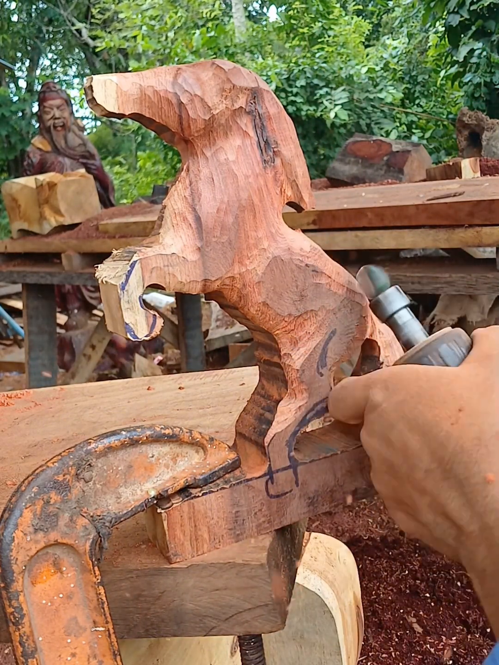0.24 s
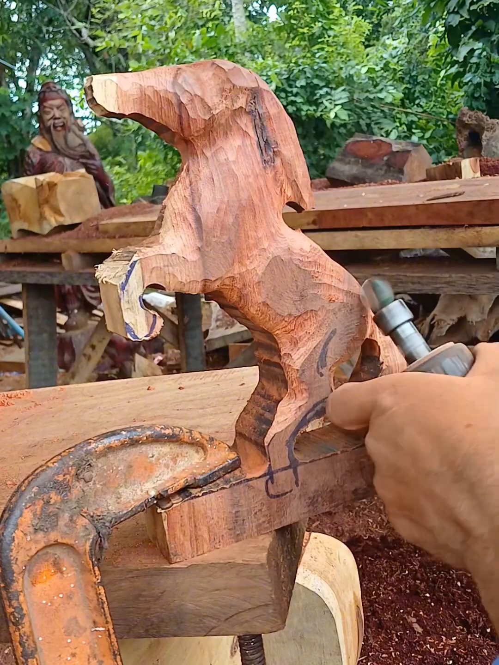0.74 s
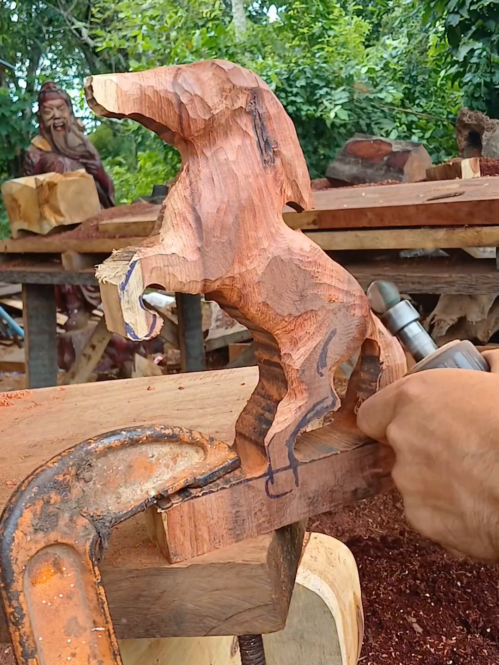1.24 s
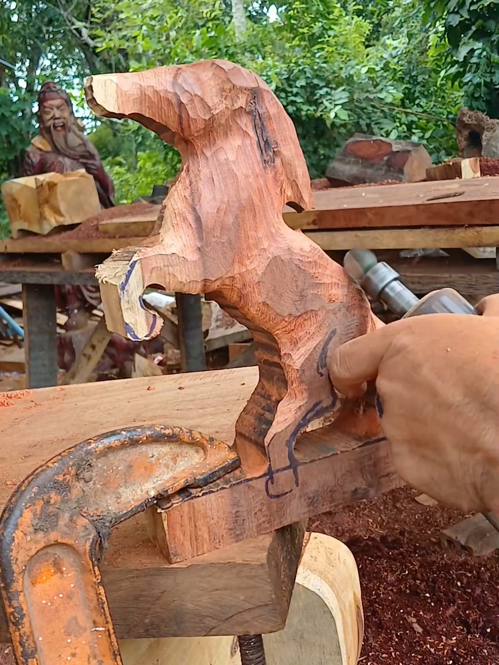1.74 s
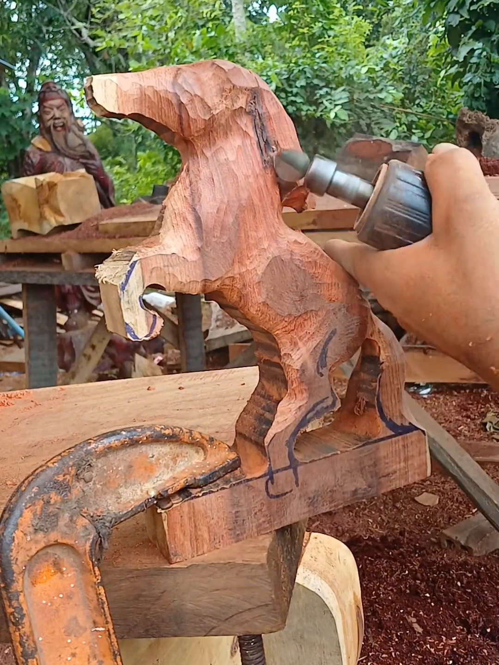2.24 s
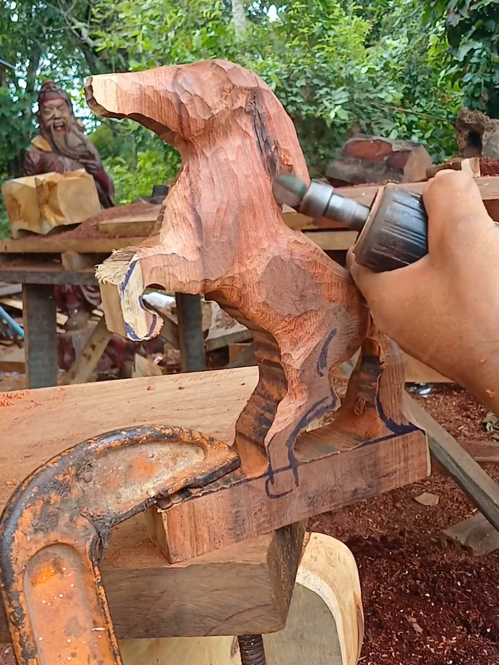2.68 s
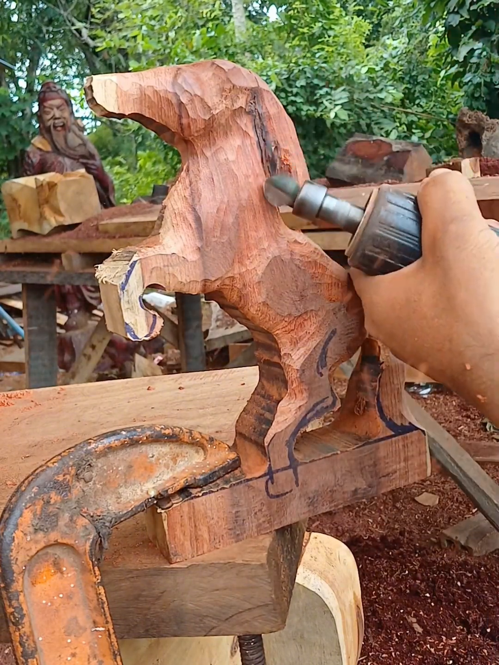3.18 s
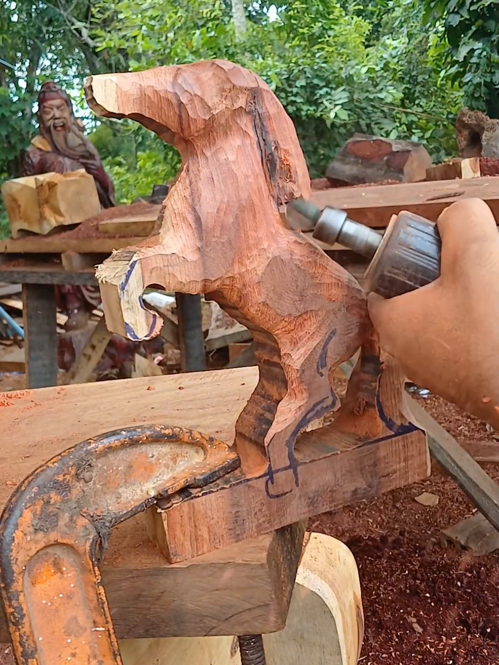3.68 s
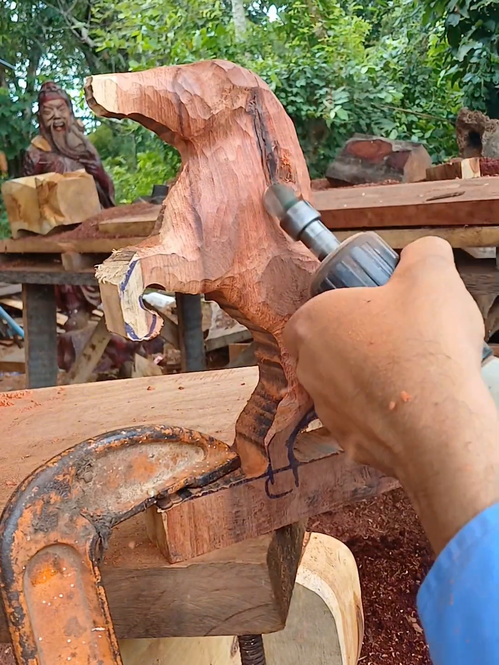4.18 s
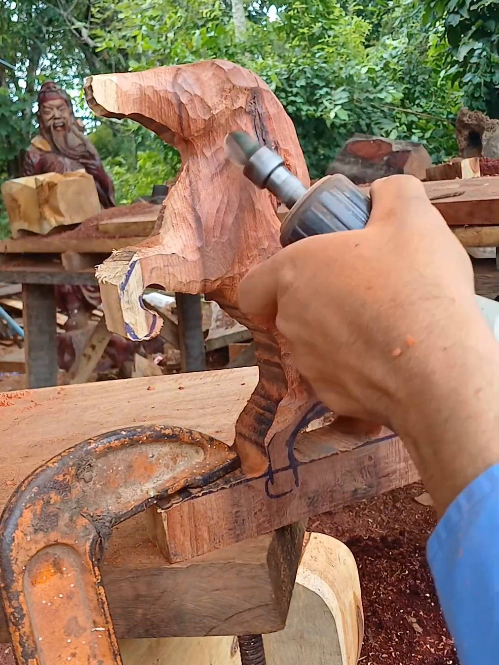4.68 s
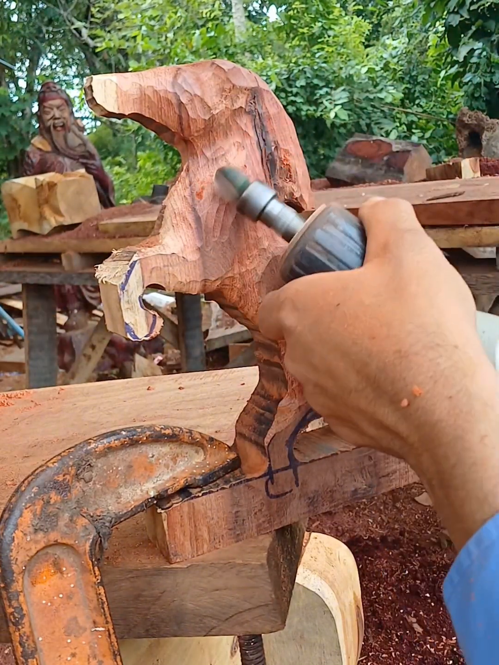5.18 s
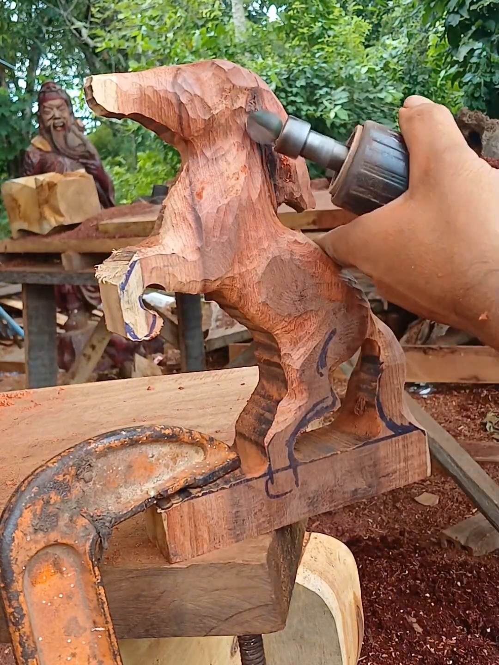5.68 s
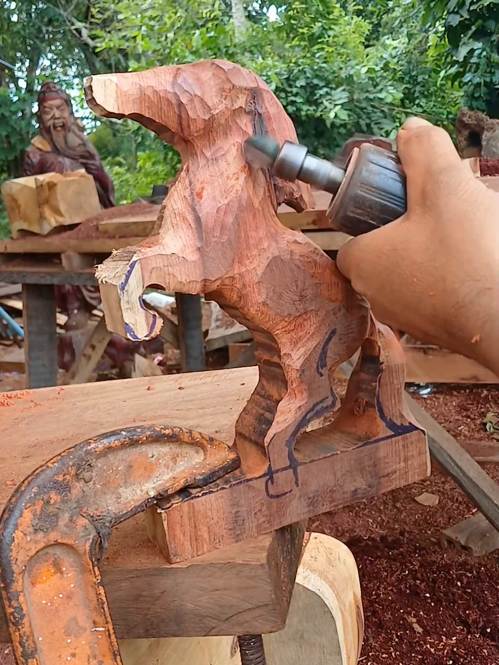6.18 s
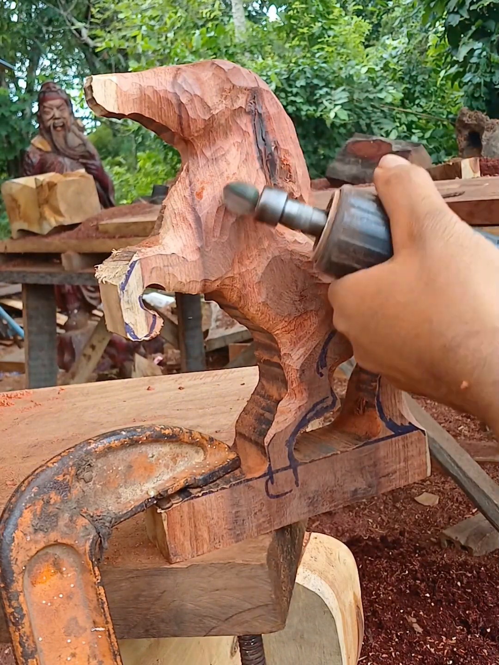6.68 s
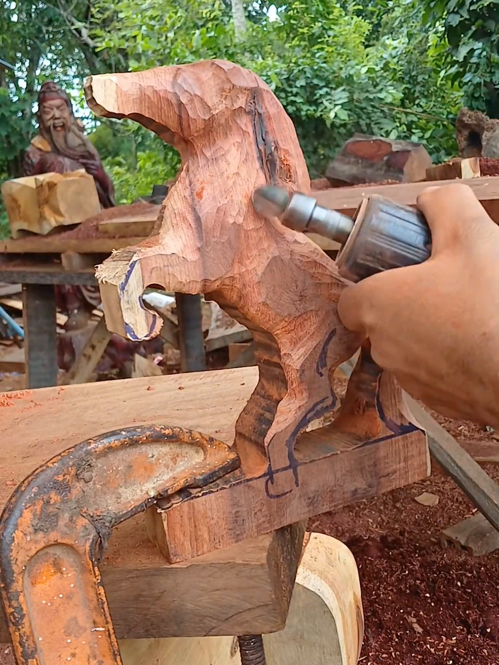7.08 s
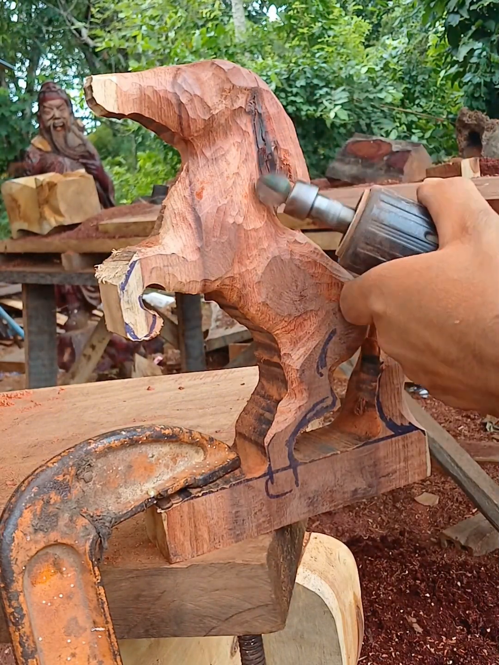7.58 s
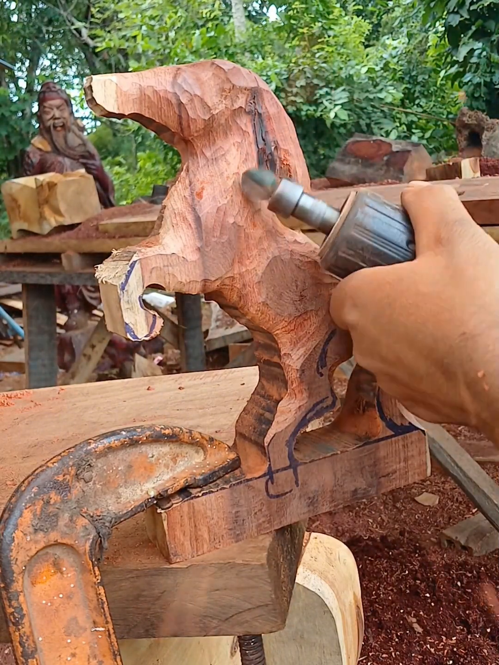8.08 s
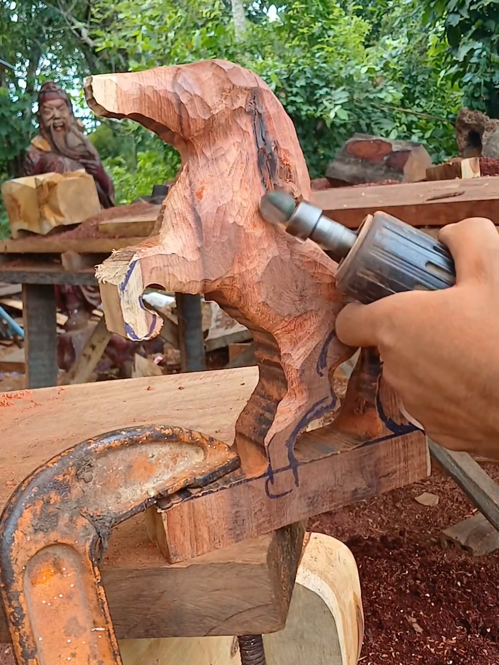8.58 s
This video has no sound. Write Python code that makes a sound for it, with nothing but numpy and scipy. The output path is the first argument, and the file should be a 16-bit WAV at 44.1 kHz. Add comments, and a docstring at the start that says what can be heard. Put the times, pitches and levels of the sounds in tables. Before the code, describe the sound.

Close, piercing grinder whine with bright hiss wavers as a burr carves wood; chips tap the microphone, and a far horn-like tone briefly sounds.

```python
"""In an open workshop, a handheld rotary tool carves a wooden figure close to the microphone.
Its fan whines in blade harmonics and hisses as shaped noise; each bite of the burr drags the motor's speed down.
A few chips strike the microphone as short dying rings, and at times the burr chatters at half the whine's pitch.
Far off, an engine runs and a horn-like tone comes and goes, both built from wavering harmonics.
Dull ringing knocks fall several times a second over the soft noise of the open air."""
import sys
import numpy as np
from scipy import signal
from scipy.io import wavfile
from scipy.ndimage import uniform_filter1d

SR = 44100
rng = np.random.default_rng(int(sys.argv[2]) if len(sys.argv) > 2 else 0)


def output_pcm(signal):
    """Save a mono or channel-first signal as 16-bit PCM at the path in sys.argv[1].

    Samples are clipped to [-1, 1] before scaling.
    """
    pcm = np.clip(np.atleast_2d(signal).T, -1, 1) * 32767
    wavfile.write(sys.argv[1], SR, np.round(pcm).astype(np.int16))


N = 389403
T = np.arange(N) / SR
BLADES = 14


def gain_of(db):
    """Amplitude factor for a level in dB."""
    return 10 ** (np.asarray(db) / 20)


def evened(x):
    """Scales to rms 1."""
    return x / np.sqrt(np.mean(abs(x) ** 2) + 1e-20)


def read(points, hz):
    """Reads a spectrum table on a log-frequency axis."""
    f, value = np.transpose(points)
    return np.interp(np.log(hz + 1), np.log(f + 1), value)


def curves(rows):
    """Draws each column of a timed table as a straight-line curve over every sample."""
    s, *columns = np.transpose(rows)
    return [np.interp(T, s, column) for column in columns]


def add(mix, s, sound):
    """Lays a sound into the mix from s seconds on, cut off at the end."""
    part = mix[:, max(round(s * SR), 0):][:, :sound.shape[-1]]
    part += sound[..., :part.shape[1]]


def lagged(x, lag_s):
    """Follows x with a first-order lag."""
    keep = np.exp(-1 / (lag_s * SR))
    return signal.lfilter([1 - keep], [1, -keep], x - x[0]) + x[0]


def drift(rate):
    """Slow complex chance of rms 1, up to about rate changes a second."""
    count = 4096
    f = np.fft.fftfreq(count, T[-1] / count)
    chance = rng.standard_normal(count) + 1j * rng.standard_normal(count)
    slow = np.fft.ifft(chance / (1 + (f / rate) ** 2))
    return np.interp(T, np.linspace(0, T[-1], count), evened(slow))


def angle_of(hz):
    """Running phase in radians of a changing frequency."""
    return 2 * np.pi * np.cumsum(hz) / SR


def tone(angle, swing):
    """A sine whose height and phase follow the complex curve swing."""
    return np.sqrt(2) * (swing.real * np.cos(angle) - swing.imag * np.sin(angle))


def ring(modes, t):
    """Dying modes after one blow, peak 1."""
    sound = sum(gain_of(db - 60 * t / t60) * np.sin(2 * np.pi * hz * t) for hz, db, t60 in modes)
    return sound / abs(sound).max()


# How alike the noise is at the two microphone ports. Each row: frequency in Hz, likeness (held to at most 1).
PORT_LIKENESS = [(100, 1.2), (700, 0.64), (1500, 0.87), (3100, 1), (7000, 0.62), (11000, 0.46),
                 (15000, 2.5)]
# How far the left port runs ahead. Each row: frequency in Hz, lead in radians.
PORT_LEAD = [(1500, -0.29), (3400, 0.6), (4100, 0.99), (7000, -0.71), (8300, 1.25), (10000, 0.3),
             (12400, 1.36), (15500, 1.4)]
# How the noise leans to one side. Each row: frequency in Hz, left over right in dB.
PORT_BALANCE = [(300, 0.11), (2400, 0.43), (4400, -0.31), (8000, -0.2), (15000, 0)]
# Where extra treble lands. Each row: frequency in Hz, share of the extra treble.
TREBLE_SHARE = [(3500, 0.18), (6000, 0.97), (9000, 0.78), (11500, 1.24), (13500, 1.6), (15200, 1.2)]


def air(colour, treble_db, patchy_db):
    """Coloured noise at the two ports, its level patchy across time and frequency."""
    size = 512
    hz = np.fft.rfftfreq(size, 1 / SR)
    at = np.arange(0, N + size, size // 4)
    a, b, c, d, patches = rng.standard_normal((5, len(at), len(hz)))
    patches = uniform_filter1d(patches, size=14, axis=0)
    patches = evened(uniform_filter1d(patches, size=9, axis=1))
    # the right port mixes the left's noise with some of its own
    same = np.clip(read(PORT_LIKENESS, hz), -1, 1)
    left = a + 1j * b
    right = same * left + np.sqrt(1 - same ** 2) * (c + 1j * d)
    right = right * np.exp(-1j * read(PORT_LEAD, hz))
    lean = gain_of(read(PORT_BALANCE, hz) / 2)
    extra_db = treble_db[np.minimum(at, N - 1), None] * read(TREBLE_SHARE, hz)
    field_db = read(colour, hz) + patchy_db * patches + extra_db
    frames = np.array([left * lean, right / lean]) * gain_of(field_db)
    sound = signal.istft(frames.swapaxes(1, 2), nperseg=size, noverlap=size * 3 // 4)[1]
    return evened(sound[:, :N])


# Strokes of the burr into the wood, each one arch of force. Each row: start in seconds, length in seconds,
# then the push at the top of the arch: drag in Hz, whine in dB, overtones in dB, treble of the hiss in dB.
STROKES = [(0.0, 0.047, 152, 1.5, 2, 0), (0.122, 0.049, 119, 0, 1.2, 2.5), (0.29, 0.067, 227, 4, 2.8, -3),
           (0.395, 0.074, 85.3, 0.5, -0.7, -0.5), (0.549, 0.048, 231.4, 2.5, -1, 0.5),
           (0.657, 0.053, 153.6, 2.5, 2, -2), (0.765, 0.051, 118.2, -3, 1, 0),
           (0.868, 0.036, 183, -2, 6, -8), (1.011, 0.055, 221.6, 0.5, 0.5, 1),
           (1.136, 0.036, 169.5, -0.5, 3, 0), (1.335, 0.031, 102.9, 1.5, -1, 4),
           (1.584, 0.043, 316, 2.5, 5, 0.5), (1.709, 0.099, 243, -1.5, 3.5, -0.5),
           (1.816, 0.16, 120.2, -4, 0, 2), (2.179, 0.082, 305, -5, -1, -2),
           (2.382, 0.044, 265, -3, -2.9, -2), (2.4, 0.17, 188.7, -1.2, 4.5, 0),
           (2.597, 0.1, 335.6, -2, 4.5, 1.2), (2.667, 0.13, 203.3, -5, 3, 0),
           (3.073, 0.13, 101, -1.2, -2.4, 0.5), (3.219, 0.15, 157.7, 0.3, -0.5, 2.0),
           (3.394, 0.11, 223.5, -0.2, 0.5, 1.5), (3.539, 0.14, 312, -4.1, 2.3, 1.5),
           (3.721, 0.149, 337.6, -3.5, 0, 3), (4.018, 0.095, 195, 1.5, 1, 3),
           (4.136, 0.093, 221, 0.5, -6, 3), (4.434, 0.063, 268, 1.5, 4, -0.4),
           (4.548, 0.097, 351.6, -2, 4.5, -0.8), (4.684, 0.094, 282, -1.5, 7, -1.5),
           (4.842, 0.052, 308, 0.8, 11.5, -1), (4.962, 0.035, 159, -4, 1.7, 3),
           (5.078, 0.07, 178, 0.5, -1, 0.5), (5.386, 0.2, 280.4, -4.5, -0.5, 4),
           (5.665, 0.15, 337, -3.3, -3.5, 4.5), (5.881, 0.2, 371.4, -1.5, 1.5, 1.5),
           (6.153, 0.072, 343, -6, 4, 3.5), (6.277, 0.085, 188.4, -4.5, 1, 1.5),
           (6.379, 0.063, 254, -6, 1, 2), (8.064, 0.031, 188, -1.3, -4, 0.2),
           (8.187, 0.051, 226, -0.9, 1.4, 2.5), (8.322, 0.14, 72, 0.2, -3, 0.5),
           (8.715, 0.043, 191, -1.2, -9, 2)]
# Runs of light touches as the burr skips along the surface.
# Each row: start in seconds, number of touches, touches per second, drag in Hz.
SKIPPING_RUNS = [(6.696, 6, 14.1, 300), (7.148, 5, 13.25, 345), (7.565, 3, 12.6, 340)]
# each touch is a tiny stroke
TOUCH_S, TOUCH_WHINE_DB, TOUCH_OVERTONES_DB, TOUCH_HISS_DB = 0.036, -3.5, 1, 2.5


def burr():
    """Sums the force of all strokes and touches: drag (Hz), then pushes on whine, overtones and hiss (dB)."""
    touches = [(start + k / rate, TOUCH_S, drag_hz, TOUCH_WHINE_DB, TOUCH_OVERTONES_DB, TOUCH_HISS_DB)
               for start, count, rate, drag_hz in SKIPPING_RUNS for k in range(round(count))]
    effects = np.zeros((4, N))
    for start, length, *strengths in list(STROKES) + touches:
        force = np.sin(np.pi * np.arange(0, length, 1 / SR) / length)
        add(effects, start, np.outer(strengths, force))
    return effects


# How each blade harmonic, from the first up, reaches the ports.
# Each row: left over right in dB, lead of the left in radians, reflected wave over direct wave.
HARMONIC_PATHS = [(2, -0.21, 0.2), (-0.5, 0.47, 0.88), (-1, -0.28, 0.61), (-1.5, 0.26, 0.83),
                  (-2.5, 0.67, 0.72), (.5, 1.0, 0.53)]
# Overtones of the whine. Each row: harmonic, base level in dB, share of the air's extra treble it takes.
WHINE_OVERTONES = [(2, -41.5, -0.12), (3, -35.5, -0.074), (4, -36, 0.54), (5, -37.5, 0.54), (6, -38, 0.14)]
# The whine's octave swells and fades on its own. Each row: time in seconds, change in dB.
OCTAVE_SWELLS = [(0, 3), (1.9, -1.5), (2.45, 2.5), (2.7, 3.5), (3.3, 6.5), (4.03, -0.5), (4.7, 0),
                 (5.45, -4), (5.8, -8), (6.03, 3.5), (6.3, -4.5), (7.0, -3), (8.3, 0), (8.83, 7.5)]


def whine(shaft, whine_db, overtones_db, bright_db, swing_db):
    """Blade harmonics; reflections from hand and wood shift, so each port hears its own flutter."""
    levels = [whine_db]
    levels += [overtones_db + db + share * bright_db for _, db, share in WHINE_OVERTONES]
    levels[1] = levels[1] + curves(OCTAVE_SWELLS)[0]
    out = np.zeros((2, N))
    for k, (pan_db, lead, reflected) in enumerate(HARMONIC_PATHS):
        # the upper harmonics' narrow beams fade in and out more than the lowest line wavers
        fade_db = 2.5 if k else 0.63
        fade = evened(gain_of(fade_db * drift(10).real))
        # turbulence roughens the upper harmonics most
        roughness = 0.16 * np.sqrt(k + 0.13) * drift(110)
        shared = (1 + roughness) * fade
        lean_db = pan_db + (swing_db if k else 0)
        for port, side in enumerate((.5, -.5)):
            flutter = evened(shared + reflected * fade * drift(16)) * np.exp(1j * side * lead)
            out[port] += gain_of(levels[k] + side * lean_db) * tone((k + 1) * BLADES * shaft, flutter)
    return out


RUSH_DB = -26.5  # base level of the hiss
# Colour of the hiss. Each row: frequency in Hz, relative density in dB per Hz.
HISS_COLOUR = [(150, -42), (400, -15.5), (800, -11.5), (980, -14.5), (1400, -7.5), (1900, -4), (2600, -4),
               (3050, 0), (4300, -2), (5600, -0.5), (8000, 1.5), (10000, 3), (12000, 1), (15500, 0.5)]


def rush(shaft, treble_db):
    """Air and dust hiss, throbbing slightly once and three times each turn of the shaft."""
    chop = 1 + 0.099 * np.cos(3 * shaft) + 0.026 * np.cos(shaft)
    return gain_of(RUSH_DB) * chop * air(HISS_COLOUR, treble_db, patchy_db=0.8)


# Weaker lines of motor and burr. Each row: multiple of the shaft speed, base level in dB.
SHAFT_ORDERS = [(31, -58), (39, -55), (45, -56), (49, -43), (53, -43), (57, -45), (59, -46), (63, -54),
                (73, -48), (76, -52), (81, -58)]


def motor(shaft):
    """Weak shaft orders between the blade harmonics fade in and out, partly apart at the two ports."""
    out = np.zeros((2, N))
    for multiple, db in SHAFT_ORDERS:
        shared = .5 + drift(14)
        own = 0.36 * drift(14)
        out += gain_of(db) * tone(round(multiple) * shaft, evened(np.array([shared + own, shared - own])))
    return out


# Pressure of the hand beneath the strokes. Each row: time in seconds, drag in Hz.
HAND_PRESSURE = [(0, 46), (1, 18.6), (1.3, 94), (1.9, 1.05), (2.1, 14), (2.55, 21.7), (2.85, 124),
                 (3.2, 19), (4.3, 54), (5, 41.5), (5.35, 16.5), (6.1, 67), (6.5, 97), (6.8, 101),
                 (7.25, 66), (7.7, 68), (7.9, 111), (8.83, 60)]
# How the tool faces the microphone as the hand moves round the figure. Each row: time in seconds,
# then changes in dB of the whine, the overtones, the rush of air and its extra treble.
TOOL_FACING = [(0.0, -0.5, 1, -0.3, 2.5), (0.8, 0.3, 2, 0.2, 1.5), (1.9, 0, 4, 0.5, 0.1),
               (2.15, 3.5, -5, 0, -0.2), (2.3, -0.7, -5.3, -4.5, -1.5), (2.45, -1, -8, -1, -2.5),
               (2.6, -1.9, -3, -1.2, -2), (3.2, 2, -2.5, 0, -1), (3.88, -1.7, 0, -0.5, -3),
               (4.03, -1.2, 2.2, -0.3, 1.5), (4.9, 0.8, -6, 1, 1.6), (5.2, 0.7, -1.5, 0.3, 0),
               (5.33, 3.5, 1, 2, -5), (6.1, -0.4, 0.1, -0.2, -1.9), (6.6, 1.4, 1.5, 0.6, -2.6),
               (7.1, -1, -1.5, -1, -1.4), (7.9, 1.1, 0.5, 0.1, -0.5), (8.83, 2.5, 0.5, 0.2, 0.6)]
# The overtones and hiss swing between the ports as the tool is turned.
# Each row: time in seconds, left over right in dB.
TURNING = [(0, -1.3), (1.33, -1.5), (2.02, -0.3), (2.19, 2), (2.8, -.5), (3.2, 0), (6.5, .3), (8.83, -.5)]
# blade rate with no load, and the lag of the rotor as a load drags it down
FREE_HZ, ROTOR_LAG_S = 2619.7, 0.1
# base level of the whine's lowest line, and the lags with which whine and hiss answer a stroke
BLADE_TONE_DB, BLADE_TONE_LAG_S, DUST_LAG_S = -32.5, 0.0061, 0.0047
SHAFT_LEVEL_DB = -2.5  # trim of the weak shaft lines


def rotary_tool():
    """The load on the burr sets the speed and colours the whine; the hand's angle sets what beams forward."""
    drag, cut_whine_db, cut_overtones_db, cut_hiss_db = burr()
    sag_hz = lagged(drag + curves(HAND_PRESSURE)[0], ROTOR_LAG_S)
    # the grain of the wood shakes the speed a little
    grain_hz = 4 * drift(25.0).real
    shaft = angle_of((FREE_HZ - sag_hz + grain_hz) / BLADES)
    front_db, beam_db, air_db, bright_db = curves(TOOL_FACING)
    swing_db = curves(TURNING)[0]
    whine_db = BLADE_TONE_DB + front_db + lagged(cut_whine_db, BLADE_TONE_LAG_S)
    fan = whine(shaft, whine_db, beam_db + cut_overtones_db, bright_db, swing_db)
    # the hiss flickers in level, and its treble flickers faster
    treble_db = bright_db + lagged(cut_hiss_db, DUST_LAG_S) + 0.83 * drift(21).real
    hiss = gain_of(air_db + 0.5 * drift(12).real) * rush(shaft, treble_db)
    # the shaft lines beam as the overtones do
    lines = gain_of(SHAFT_LEVEL_DB + beam_db) * motor(shaft)
    turned = gain_of([swing_db / 2, -swing_db / 2]) * (hiss + lines)
    return fan + turned + chatter(shaft)


def distant(hz, level_db, lines, unsteady):
    """A far harmonic source whose lines waver on the way through the air."""
    angle = angle_of(hz)
    wavering = sum(gain_of(db) * tone(round(k) * angle, 1 + unsteady * drift(4.3)) for k, db in lines)
    return gain_of(level_db) * wavering


# The far engine, easing off and revving up again.
# Each row: time in seconds, mean firing rate in Hz, change of level in dB.
ENGINE_SPEED = [(0, 79.2, 3.5), (.25, 71.8, -0.5), (.5, 58, -21), (.85, 71.3, 0), (1.05, 79.9, 1),
                (1.4, 76.7, 2), (2, 78.4, 1), (2.6, 79.44, -1), (2.9, 77.45, -0.5), (3.3, 80.5, 1),
                (3.8, 77.4, 1.5), (4.35, 81.44, 1), (5.5, 79.3, 4.5), (6.35, 77.93, 0.5),
                (6.65, 79.73, 0.5), (7.4, 77.9, 2), (8.4, 79.35, 1.5), (8.8, 80, 2.5)]
# Its harmonics. Each row: multiple of the firing rate, base level in dB.
ENGINE_HARMONICS = [(5, -76), (6, -65.5), (7, -65.5), (8, -64.5), (9, -104), (10, -61.5), (11, -63.5)]


def engine():
    """Fires evenly at full speed and raggedly below it; its speed hunts a little."""
    hz, level_db = curves(ENGINE_SPEED)
    jitter_hz = np.interp(hz, [72, 77], [4, .35]) * drift(23.2).real
    hunt_hz = 0.341 * drift(2.48).real
    return distant(hz + jitter_hz + hunt_hz, level_db, ENGINE_HARMONICS, unsteady=0.57)


# Colour of the open air. Each row: frequency in Hz, relative density in dB per Hz.
YARD_COLOUR = [(20, -19), (60, -14), (120, -3.5), (200, -45), (290, 14), (400, 0), (600, -2), (800, 3.5),
               (1000, -18), (2000, 13.5), (5000, -32)]


def yard():
    """Steady coloured noise of the open air, at -52.5 dB rms."""
    return gain_of(-52.5) * air(YARD_COLOUR, np.zeros(N), patchy_db=0.0)


# Dull knocks, single or in quick pairs.
# Each row: time in seconds when the swell is complete, peak of the first blow in dB, number of blows.
DULL_KNOCKS = [(.159, -55, 2), (.788, -45, 2), (.855, -46, 1), (.91, -46, 2), (1.155, -44, 1),
               (1.442, -42, 1), (1.604, -45, 1), (1.808, -47, 1), (2.094, -46, 2), (2.786, -44, 1),
               (3.113, -47, 1), (3.404, -45.5, 2), (3.765, -46, 2), (4.053, -44, 2), (4.177, -45.5, 2),
               (4.421, -47, 1), (4.708, -45, 2), (4.828, -44.5, 1), (5.077, -46, 1), (5.358, -47, 1),
               (5.481, -46, 1), (5.728, -45, 1), (6.015, -47, 2), (6.158, -45, 1), (6.242, -47, 1),
               (6.384, -48, 1), (6.709, -44, 1), (7.035, -46, 1), (7.321, -47, 2), (7.445, -45, 1),
               (7.689, -46, 1), (7.975, -49, 2), (8.096, -47, 1), (8.22, -45, 1), (8.34, -47, 1),
               (8.629, -44, 2), (8.751, -47, 2)]
# What the knocks ring with, before a small random detuning.
# Each row: frequency in Hz, relative level in dB, time to fall by 60 dB in seconds.
KNOCK_RING = [(287, -3, 0.047), (303.5, -6, 0.24), (320, -0.5, 0.085)]
# the second blow of a pair comes this much later and louder
SECOND_BLOW_S, SECOND_BLOW_DB = 0.041, 1.5
# weak knocks that fall at random in between
WEAK_PER_S, WEAK_DB = 3, -50


def knocks():
    """Distant soft blows swell for a few cycles and die; some come as quick pairs, the second a little louder."""
    rise_s = 0.0117
    out, t = np.zeros((2, N)), T[:SR // 5]
    faint = [(s, WEAK_DB, 1) for s in T[rng.random(N) < WEAK_PER_S / SR]]
    for s, db, blows in list(DULL_KNOCKS) + faint:
        for k in range(round(blows)):
            detune = rng.uniform(1.0, 1.03)
            swell = np.minimum(t / rise_s, 1) ** 2
            blow = ring(KNOCK_RING, t * detune) * swell
            level = gain_of(db + k * SECOND_BLOW_DB)
            add(out, s + k * SECOND_BLOW_S - rise_s, level * blow / abs(blow).max())
    return out


# Chips striking the microphone. Each row: time in seconds, peak at the left port in dB, left over right in dB.
CHIP_HITS = [(2.2020, -9.5, 17), (2.2078, -14, 22), (2.2170, -26, 3), (2.2365, -7, 29), (2.404, -15.5, 24),
             (2.4089, -22, 16), (2.4120, -12, 27), (2.4160, -4.5, 31)]
# Ring of the microphone's case under a blow.
# Each row: frequency in Hz, relative level in dB, time to fall by 60 dB in seconds.
CASE_RING = [(308, -1, 0.012), (527, 1, 0.0069), (767, 1, 0.014), (1420, 14, 0.0015), (3630, 3, 0.001)]


def chips():
    """Chips hit the case by the left port; little bass passes, so each tap ends in a short low swing."""
    blow = ring(CASE_RING, T[:SR // 20])
    low_cut = signal.butter(4, 260, "high", fs=SR, output="sos")
    tap = signal.sosfilt(low_cut, blow) + 0.059 * blow
    tap = tap / abs(tap).max()
    out = np.zeros((2, N))
    for s, db, pan_db in CHIP_HITS:
        add(out, s, gain_of([[db], [db - pan_db]]) * tap)
    return out


# Spells of chatter, each a smooth hump. Each row: middle in seconds, length in seconds, level in dB.
CHATTER_SPELLS = [(3.637, .12, -51), (3.831, 0.14, -57), (5.50, 0.085, -47), (5.76, 0.046, -38),
                  (6.019, .16, -61), (6.2, .08, -54), (7.17, 0.072, -46)]
# Lines of the chatter. Each row: multiple of the shaft speed, relative level in dB.
CHATTER_ORDERS = [(7, -3), (21, -15), (35, -2), (49, 3), (63, 6)]


def chatter(shaft):
    """The burr bounces at half the whine's pitch, adding lines midway between its harmonics."""
    bite = sum(gain_of(db) * np.exp(-(2 * (T - s) / length) ** 2) for s, length, db in CHATTER_SPELLS)
    return bite * sum(gain_of(db) * tone(round(k) * shaft, 0.71 + .5 * drift(35)) for k, db in CHATTER_ORDERS)


# The far horn-like tone. Each row: time in seconds, pitch in Hz, level in dB.
HORN_CALL = [(5.1, 200.2, -85), (5.2, 202.7, -57), (5.35, 206.6, -61), (5.55, 204.5, -56),
             (5.75, 201.8, -55), (5.9, 198.8, -57.5), (6.15, 200.2, -62), (6.4, 199, -92)]
# Its harmonics. Each row: multiple of the pitch, relative level in dB.
HORN_HARMONICS = [(1, -19), (2, 0), (3, -19), (4, -4), (5, -14), (7, -12)]


def horn():
    """Wavering harmonics on a gliding pitch, rising out of near silence and sinking back."""
    return distant(*curves(HORN_CALL), HORN_HARMONICS, unsteady=0.34)


def scene():
    """The tool and its chips up close; engine, open air, knocks and horn far off."""
    return rotary_tool() + engine() + yard() + knocks() + chips() + horn()


def record(dry):
    """The recorder's band limit: a steep low-pass at 15740 Hz."""
    low_pass = signal.firwin(1023, 15740, window=("kaiser", 8), fs=SR)
    return signal.oaconvolve(dry, low_pass[None], "same")


dry = scene()
out = record(dry)
output_pcm(out)
```